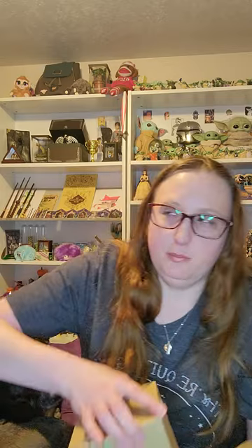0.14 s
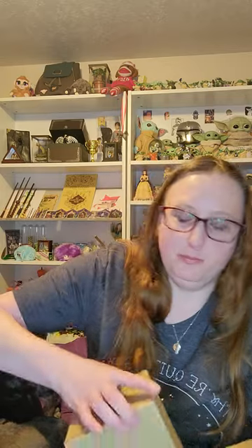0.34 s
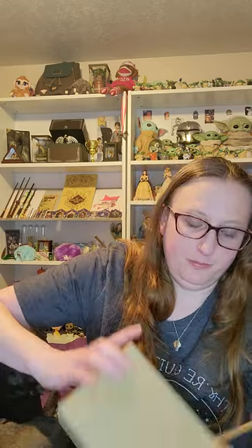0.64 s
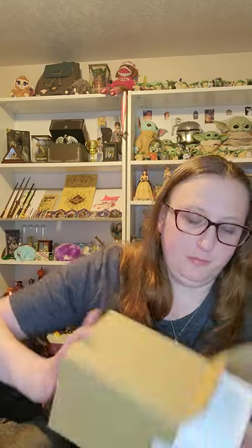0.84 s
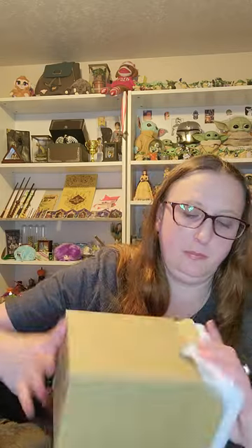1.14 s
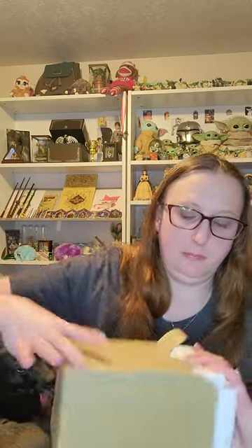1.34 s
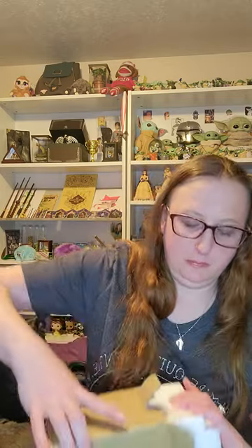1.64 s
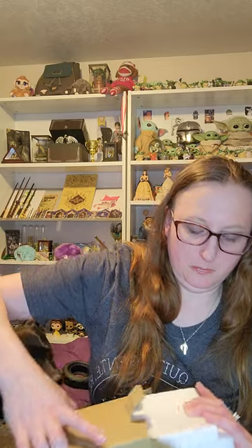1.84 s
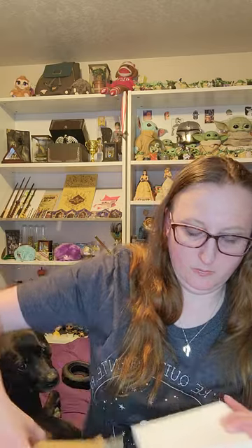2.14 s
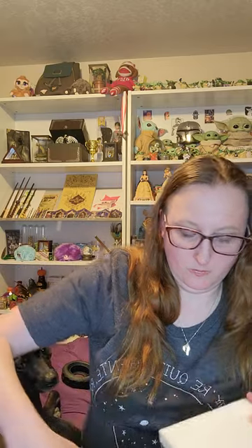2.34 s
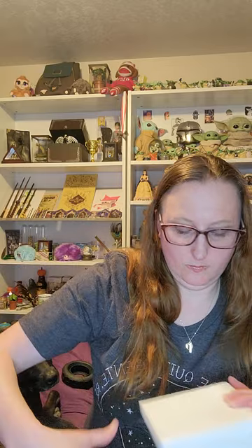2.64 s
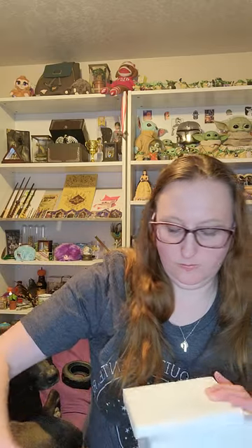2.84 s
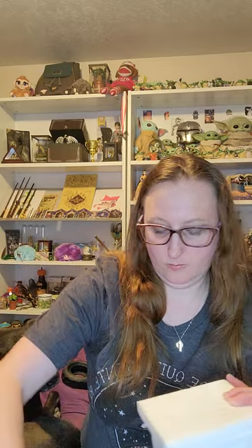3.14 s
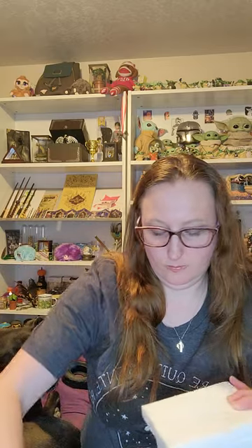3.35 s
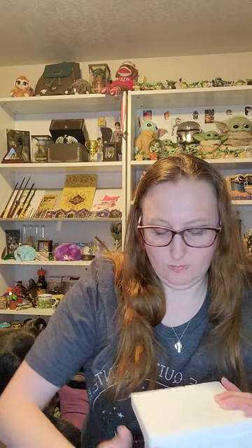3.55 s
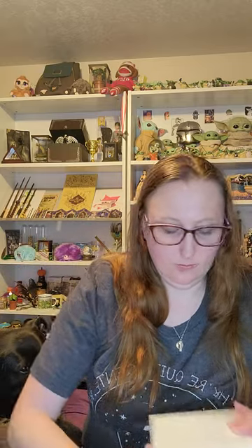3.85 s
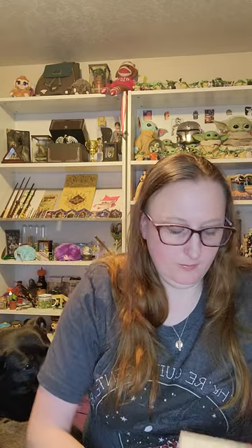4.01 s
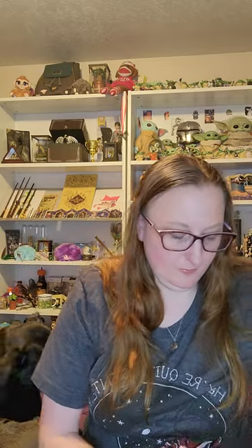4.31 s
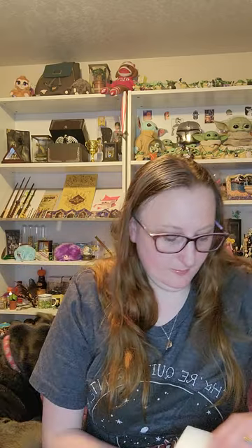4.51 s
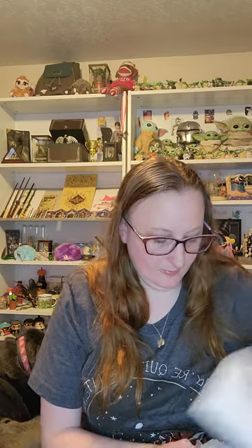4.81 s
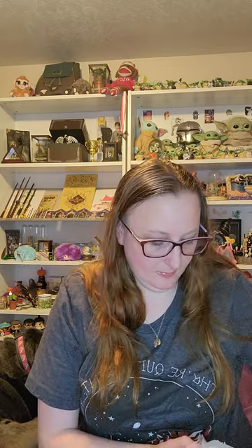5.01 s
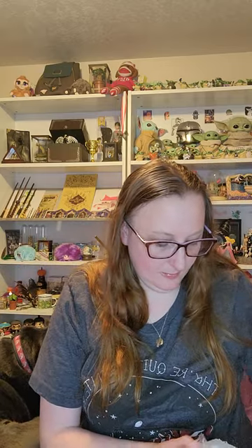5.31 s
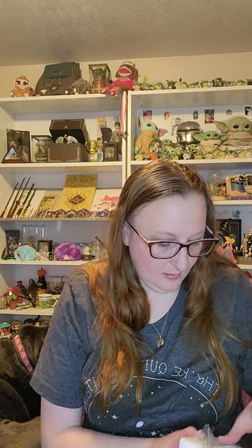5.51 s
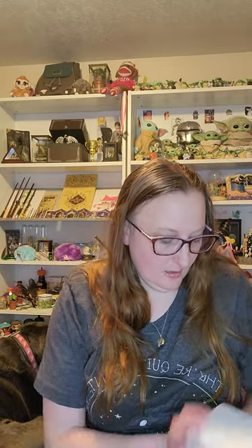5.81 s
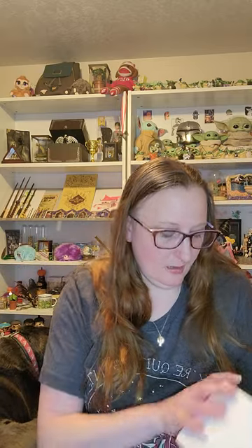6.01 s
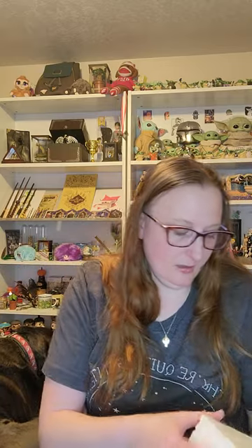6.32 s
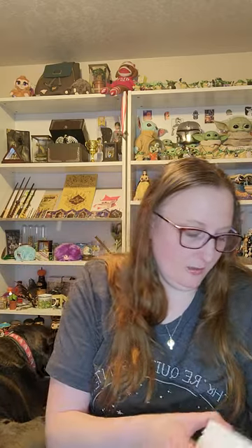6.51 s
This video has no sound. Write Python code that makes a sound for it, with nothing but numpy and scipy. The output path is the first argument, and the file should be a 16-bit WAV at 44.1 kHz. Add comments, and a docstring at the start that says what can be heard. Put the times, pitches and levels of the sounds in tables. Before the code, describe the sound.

In a small furnished room, close to the microphone, hands slide foam out of a cardboard box in uneven hissing strokes with hollow scuffs. The strongest rub ends near two seconds; the box is put aside with soft bumps and a loud double knock. Then foam is peeled with brighter hiss, small squeaks and dry snaps over a faint hush.

```python
"""First, hands slide a foam block out of a cardboard box: tiny slips ring the foam and drum the hollow box.
Around two to three seconds they set the box aside, and its walls and the air inside ring with knocks.
Then they peel the foam apart, with more hissing strokes, squeaks made of narrow noise, and dry snaps.
Soft low thumps come all along, in a small furnished room with a faint steady hush.
Two close microphone ports hear it slightly from the right."""
import sys
import numpy as np
from scipy import signal
from scipy.fft import rfft, irfft
from scipy.io import wavfile
from scipy.ndimage import map_coordinates

SR = 44100
rng = np.random.default_rng(int(sys.argv[2]) if len(sys.argv) > 2 else 0)


def waveform_to_disk(signal):
    """Save audio, clipped to [-1, 1], as 16-bit WAV at the path in sys.argv[1]."""
    frames = np.transpose(np.atleast_2d(signal))
    scaled = np.clip(frames, -1, 1) * 32767
    samples = np.round(scaled).astype(np.int16)
    wavfile.write(sys.argv[1], SR, samples)


N = 293919

# Where the hands are: (time [s], delay of left behind right [ms], left minus right [dB])
HAND_PLACES = [(0, 0.33, -.5), (.75, 0.2, -2), (1.25, 0.087, -1), (1.8, 0.178, 0), (2.3, 0.17, -1.5),
               (2.8, 0.39, -1.5), (3.2, 0.34, -3.5), (3.7, 0.2, -1), (4.5, 0.27, -2), (5.5, 0.24, -1.5),
               (6.66, 0.22, -1.5)]
# Color of the room hush: (frequency [Hz], relative level per Hz [dB])
HUSH_COLOR = [(18, -37), (30, 10.5), (161, -3.5), (303, 0.5), (554, 2.5), (1160, -4), (1430, -1),
              (2750, -8), (3490, -5), (7470, -14), (10800, -22), (14800, -15), (16000, -12)]
HUSH_DB = -74
# Strokes of the hands: (full grip reached [s], rise [s], hold [s], fall [s], foam hiss [dB],
# dull skin drag against hiss [dB], fine fizz against hiss [dB], box walls [dB], box cavity [dB])
HAND_STROKES = [ (0.079, 0.29, 0.037, 0.26, -44.5, -3, -6, -53, -57.5),
                (0.287, 0.066, 0.0091, 0.17, -52, -4.5, -4.5, -58, -61.5),
                (0.413, 0.16, .015, 0.13, -52.5, -2.5, -6, -58.5, -62.5),
                (0.472, 0.047, 0.041, .1, -59, 1, -6.5, -60, -67),
                (0.551, .02, 0.009, .03, -63, -2, -4, -65, -65.5),
                (0.631, 0.091, 0.1, 0.059, -40.5, -4, -4.5, -49, -60),
                (0.834, 0.051, 0.0167, 0.045, -56.5, 0.5, -3, -54, -63),
                (0.887, .08, 0.0083, 0.025, -49.5, 0, -5, -51.5, -61),
                (0.964, 0.063, 0.011, 0.034, -46, 0.5, -4.5, -45.5, -54.5),
                (1.034, .04, .01, 0.16, -58.5, -2, -6, -60.5, -60.5),
                (1.188, 0.19, 0.011, 0.21, -65, -2.5, -1.5, -65.5, -71.5),
                (1.238, 0.041, .07, .04, -68, 0.5, -7, -63.5, -72),
                (1.35, .02, .02, 0.074, -65.5, -1, -5, -61, -73),
                (1.423, 0.04, 0.023, .015, -71, -2, -3, -68, -82),
                (1.485, 0.009, 0.0038, 0.049, -61.5, 0.5, -23, -63, -85),
                (1.548, 0.023, 0.04, 0.091, -53.5, -1, -6, -58.5, -61.5),
                (1.711, 0.046, 0.081, .05, -42, -4.5, -5, -50.5, -62.5),
                (1.782, 0.11, 0.14, 0.17, -35.5, -9.5, -8, -51.5, -61),
                (1.974, .12, 0.056, 0.044, -36.5, -6.5, -3.5, -52.5, -60.5),
                (2.065, 0.014, 0.005, 0.058, -50, 0, 0.5, -59, -51.5),
                (2.213, 0.028, 0.064, 0.066, -49, -5.5, -7.5, -60.5, -56.5),
                (2.421, 0.14, 0.0096, .03, -62, 5.5, -16, -69, -67),
                (2.499, 0.049, .005, 0.044, -65, -0.5, -9, -74, -76),
                (2.636, 0.06, 0.025, 0.056, -62.5, 0.5, -5, -62, -64),
                (2.677, 0.016, 0.006, 0.069, -63, -14, -4, -64, -43),
                (2.923, 0.067, .006, 0.025, -59, -12, -3.5, -72, -62),
                (2.97, .02, .01, 0.053, -63.5, -2, -18, -74, -72),
                (3.005, 0.036, 0.011, 0.022, -52.5, -6, -7, -51, -41),
                (3.023, 0.0047, 0.012, 0.035, -44, 4, -13, -36, -36),
                (3.103, 0.14, 0.061, .045, -56, -13, -10.5, -62, -56.5),
                (3.238, 0.053, 0.013, 0.087, -60.5, -6.5, -9, -72, -54),
                (3.292, .04, 0.0069, 0.037, -70, -2, -5, -63, -61),
                (3.567, .008, 0.0033, 0.014, -44, -11.5, -1.5, -62.5, -63.5),
                (3.629, 0.032, 0.011, 0.069, -44.5, -3.5, -6.5, -59.5, -68),
                (3.699, 0.035, 0.12, .1, -43, -4.5, -9, -61.5, -60.5),
                (3.831, 0.1, 0.11, 0.11, -39, -7.5, -6, -59, -59),
                (3.973, 0.058, 0.019, 0.0485, -38.5, -2.5, -4, -55, -61.5),
                (4.058, 0.13, 0.0182, 0.42, -44.5, -3.5, -8, -63.5, -61.5),
                (4.198, 0.15, 0.019, .1, -46.5, -4.5, -13, -68, -65),
                (4.261, 0.18, 0.069, 0.47, -45, -4.5, -4.5, -66.5, -63),
                (4.435, .1, 0.0074, 0.14, -49, -15, 2, -81, -85),
                (4.57, 0.21, 0.021, 0.087, -40.5, -10.5, -5, -61, -60.5),
                (4.672, .15, 0.022, 0.091, -40, -4, -3, -55.5, -60),
                (4.735, 0.073, 0.022, 0.033, -43, -5.5, -4.5, -72, -63.5),
                (4.814, .04, 0.047, .04, -73, 6, -7, -75, -78),
                (4.88, 0.034, 0.043, 0.14, -48, -6, -4, -70, -79),
                (4.97, .08, 0.043, 0.1, -50.5, -11.5, -10, -74, -74),
                (5.098, .06, 0.022, 0.019, -50.5, -9.5, -1, -76, -90),
                (5.16, .015, 0.0098, .028, -61, 3, 3, -68, -66),
                (5.245, 0.1, .008, .02, -58.5, -12, -13, -92, -96),
                (5.308, .1, 0.13, 0.13, -54.5, -7, -11, -69.5, -75),
                (5.534, 0.12, 0.013, 0.085, -53.5, 0, -6, -67, -68),
                (5.628, 0.074, 0.019, 0.036, -42, -3.5, -2.5, -60, -61),
                (5.69, .03, .025, .02, -67, 0, -7, -77, -76.5),
                (5.73, .013, 0.033, .1, -44, -6.5, -4, -63, -58.5),
                (5.79, 0.077, 0.01, 0.057, -38.5, -6.5, -7, -56, -57.5),
                (5.843, .05, 0.037, 0.307, -47, -3.5, -9, -61, -60.5),
                (5.974, 0.081, .006, 0.088, -39.5, -4, -3.5, -57, -70),
                (6.017, .05, .04, 0.065, -54, 7.5, -5, -65, -66),
                (6.117, 0.22, 0.016, 0.076, -43, -2, -6.5, -56, -58.5),
                (6.195, .04, 0.074, 0.045, -50.5, -3, -4, -59, -66),
                (6.295, 0.025, 0.021, 0.16, -48.5, 3.5, -11, -59.5, -61.5),
                (6.357, 0.12, 0.0089, 0.17, -46, -8, -3, -72, -63),
                (6.452, 0.46, 0.044, .1, -48.5, -20, -20, -65, -69),
                (6.591, .18, 0.024, 0.12, -37, -3, -7.5, -53, -60.5),
                (6.643, .06, .008, .02, -35.5, -5, -10, -60, -66)]
EDGE_DB = 23.5  # gained over a stroke's rise and lost over its fall
SLIPS_PER_S = 9000
# Resonances of the rubbed foam, four groups: (frequency [Hz], width [Hz], relative level [dB])
LOWER_FOAM_RING = [(3273, 350, 3), (3720, 660, 2), (6990, 1100, 1.5), (7793, 610, -5)]
UPPER_FOAM_RING = [(4585, 430, 0.63), (4710, 118, 0), (5100, 480, 1.9), (5655, 700, 2.35)]
SKIN_DRAG = [(1284, 410, -4.5), (1772, 946, 0.5), (2090, 390, -0.25), (2644, 570, -7.5)]
FINE_FIZZ = [(8260, 880, -3), (10520, 2200, -2.74), (12700, 2560, -1.15), (15770, 900, -1.46)]
# How much of the hiss is the upper foam ring: (time [s], share [dB])
UPPER_RING_SHARE = [(0, -4), (.6, -5), (1.2, -4.5), (1.7, -3), (1.9, -2.5), (2.25, -2.5), (2.4, -7),
                    (2.7, -5.5), (3.1, -7), (3.6, -2.5), (4.4, -2.5), (5.2, -2), (5.8, -3), (6.1, -2.5),
                    (6.66, -5)]
# Ringing tones of the hollow box, before a hand damps them:
# (frequency [Hz], relative level [dB], time to die by 60 dB [s])
BOX_MODES = [(60.4, -12, 0.2), (190, -17, 0.094), (336, -10.5, 0.26), (400, 1, 0.1), (511, 10, 0.052),
             (574.6, 9, 0.043), (715, 11.5, 0.095), (781, 14.5, 0.077), (910, 6, 0.058), (1016, -11, 0.11),
             (1430, -1.5, 0.095), (1915, -2, 0.028), (3542, -9.5, 0.11), (5100, -8, 0.017),
             (7240, -27, .06)]
# Brief squeaks and hollow scuffs: (start [s], length [s], pitch [Hz], level [dB])
BRIEF_SQUEAKS = [(0.015, .14, 264, -57.5), (0.338, 0.27, 1098, -57.5), (0.62, 0.16, 792, -51.5),
                 (0.873, 0.033, 385, -55), (0.93, 0.043, 815, -52), (1.222, 0.18, 712, -59),
                 (1.191, 0.19, 1303, -62), (2.201, 0.069, 256, -49.5), (2.223, 0.1, 610, -56.5),
                 (2.204, 0.13, 366, -59), (2.326, .13, 322, -67.5), (2.377, 0.082, 1380, -64),
                 (2.378, 0.049, 2250, -59), (2.612, 0.056, 403, -50.5), (2.619, 0.045, 850, -66),
                 (2.69, 0.04, 436, -46), (2.693, 0.044, 840, -71), (2.882, 0.05, 365, -54),
                 (3.029, 0.062, 1072, -49), (3.033, 0.016, 7200, -53), (3.138, 0.083, 670, -58),
                 (3.277, 0.047, 693, -55.5), (3.328, 0.035, 687, -71.5), (3.7, 0.22, 1045, -59),
                 (3.75, .15, 7620, -42.5), (3.92, 0.076, 4340, -45), (4.151, 0.088, 3220, -44),
                 (4.62, 0.086, 3410, -48), (4.925, 0.09, 1476, -60), (5.272, 0.36, 1055, -67.5),
                 (5.604, 0.04, 2420, -45.5), (5.939, 0.038, 994, -48.5), (6.034, 0.056, 685, -56),
                 (6.537, 0.127, 732, -54)]
SQUEAK_WIDTH_HZ, SQUEAK_WIDTH_SHARE = 9.2, 0.021  # higher squeaks are broader
# Soft thumps through table and lap: (time [s], level [dB], pitch [Hz], swell [s])
SOFT_THUMPS = [(0.071, -58, 124, 0.005), (0.098, -47.5, 162, 0.0057), (0.884, -61, 99.6, 0.0042),
               (0.925, -50, 108, 0.0021), (0.944, -52, 99.6, 0.0042), (1.05, -60, 144, 0.0035),
               (1.094, -69, 178, 0.0046), (1.544, -56, 139, 0.0034), (2.07, -43, 228.5, 0.0024),
               (2.211, -49, 190, 0.0084), (2.242, -51.5, 183, 0.005), (2.62, -58, 183, 0.0043),
               (2.681, -43, 206, 0.0042), (3.01, -52, 216, 0.0034), (3.025, -47.5, 173, 0.0022),
               (3.051, -51, 200, 0.0049), (3.562, -51.5, 172, 0.0026), (4.527, -57, 112, 0.0042),
               (4.599, -44.5, 81.4, 0.0021), (5.155, -60, 62.5, 0.0017), (5.63, -65, 133, 0.0084),
               (5.732, -51, 200, 0.0014), (5.98, -54, 61.9, 0.0055), (6.019, -60, 51.1, 0.0052),
               (6.288, -43.5, 85, 0.0038)]
# Dry snaps of foam and tape: (time [s], level [dB])
DRY_SNAPS = [(0.337, -39), (1.0306, -47), (1.349, -52), (1.4172, -60), (1.4496, -55), (1.482, -45),
             (1.5403, -55), (2.8462, -54.5), (2.966, -47), (3.121, -48), (3.2316, -58), (3.435, -66),
             (3.475, -72), (3.564, -35), (3.616, -37), (4.8795, -52), (5.1521, -39.5), (5.7308, -33),
             (5.976, -29.5)]
# Knocks on the box: (time [s], level [dB], cavity tones against level [dB],
# hardness, as treble against level [dB])
BOX_KNOCKS = [(2.068, -41.5, -19, -12), (2.203, -47, -6, -13), (2.239, -38, -16.5, -9),
              (2.613, -47, -6, -5), (2.685, -30, 3, -15.5), (2.986, -42.5, 10, -3), (3.0255, -17, -5, -10),
              (3.03, -14.5, -2.5, -25), (3.142, -46, 14, -12.5), (3.253, -41, -15, -9)]
ROOM_T60_S = 0.15  # time for the echo to die by 60 dB
SCATTER_HZ, SCATTER_DB = 2430, 2  # treble that reaches each port from other faces
STRAIGHT_TOP_HZ = 5832  # the directly heard rubbing softens above this
CUTOFF_HZ = 15900


def amp(db):
    """Turns decibels into a gain."""
    return 10 ** (np.asarray(db) / 20)


def rms_one(x):
    """Scales a sound to an average strength (rms) of 1."""
    return x / np.sqrt(np.mean(x ** 2) + 1e-20)


def in_time(rows):
    """Draws table columns as curves, one value a sample."""
    s, *columns = np.transpose(rows)
    return [np.interp(np.arange(N) / SR, s, column) for column in columns]


def drift(rate):
    """Wanders by joining random points with straight lines, `rate` points a second."""
    knots = rng.standard_normal(500)
    return np.interp(np.arange(N) / SR * rate, np.arange(len(knots)), knots)


def clicks_at(times, gains):
    """Puts single-sample clicks at the given times [s]."""
    out = np.zeros(N)
    np.add.at(out, np.round(np.asarray(times) * SR).astype(int), gains)
    return out


def ring(clicks, hz, t60):
    """Lets each unit click start a dying sine that begins near height 1."""
    r = amp(-60 / (t60 * SR))
    w = 2 * np.pi * hz / SR
    return signal.lfilter([0, np.sin(w)], [1, -2 * r * np.cos(w), r * r], clicks + 1e-18)


def steep(x, hz, kind):
    """Cuts one side of the spectrum with a fourth-order filter."""
    return signal.sosfilt(signal.butter(4, hz, kind, fs=SR, output="sos"), x)


def resonate(x, peaks, patchy_db):
    """Rings side-by-side resonances whose strengths wander as the grip changes; rms 1."""
    out = 0
    for k, (hz, width, level_db) in enumerate(peaks):
        r = np.exp(-np.pi * width / SR)
        tone = signal.lfilter([1, 0, -1], [1, -2 * r * np.cos(2 * np.pi * hz / SR), r * r], x)
        gain = amp(level_db + patchy_db * drift(9.0))
        out = out + (-1) ** k * gain * rms_one(tone)
    return rms_one(out)


def hush():
    """Colors steady noise for room and microphone; both ports share part of it."""
    hz = np.maximum(np.fft.rfftfreq(N, 1 / SR), 1)
    color_hz, color_db = np.transpose(HUSH_COLOR)
    color = amp(np.interp(np.log(hz), np.log(color_hz), color_db))
    white = rng.standard_normal((3, N))
    ports = white[:2] + 0.67 * white[2]
    return amp(HUSH_DB) * rms_one(irfft(rfft(ports) * color, N))


def stroke_levels():
    """Lets strokes rise, hold and fall, adding in power; gains of hiss, drag, fizz, walls, cavity."""
    t, power = np.arange(0, N / SR + .002, .001), 1e-20
    for s, rise, hold, fall, hiss_db, drag_db, fizz_db, wall_db, cavity_db in HAND_STROKES:
        # 0 during the hold, 1 at the end of the rise or fall time
        away = np.maximum(0, np.maximum((s - t) / rise, (t - s - hold) / fall))
        layers_db = np.array([hiss_db, hiss_db + drag_db, hiss_db + fizz_db, wall_db, cavity_db])
        power = power + amp(layers_db[:, None] - EDGE_DB * away) ** 2
    return in_time(np.column_stack([t, *np.sqrt(power)]))


def slips(spread_db):
    """Scatters stick-slip clicks, a few much larger: one hail heard straight, two from side faces."""
    strength = np.minimum(rng.exponential(1, (3, N)), 5)
    sizes = amp(spread_db * strength) * rng.choice([-1, 1], (3, N))
    happens = rng.random((3, N)) < SLIPS_PER_S / SR
    return rms_one(sizes * happens)


def chirps(hail):
    """Lets 40 small-cell pitches in the foam hiss sing at random moments."""
    pitches = np.geomspace(1500, 7000, 40) * rng.uniform(.98, 1.02, 40)
    out = 0
    for hz in pitches:
        gate = np.clip(drift(18.0) - .9, 0, .7)
        middle_weight = np.exp(-np.log(hz / 4600) ** 2 / 2.3)
        out = out + gate * rms_one(ring(hail, hz, 390.0 / hz)) * middle_weight
    return rms_one(out)


def rubbing():
    """Drives the foam, the box walls and the box cavity with the same hail of slips."""
    hiss, drag, fizz, wall, hollow = stroke_levels()
    hail = slips(spread_db=3.0) * amp(1.78 * drift(70.0))

    # the two foam rings share the power of the hiss
    upper = np.clip(amp(in_time(UPPER_RING_SHARE)[0]), 0, .95)
    lower = np.sqrt(1 - upper ** 2)
    foam = lower * resonate(hail, LOWER_FOAM_RING, 1.32) + upper * resonate(hail, UPPER_FOAM_RING, 1.5)
    foam += amp(-11) * chirps(hail)
    dull = resonate(hail, SKIN_DRAG, 2.42)
    fine = rms_one(steep(resonate(hail, FINE_FIZZ, 0.71), 8400, "high"))
    foam = hiss * foam + drag * dull + fizz * fine

    drum = []
    for hz, level_db, t60 in BOX_MODES[2:10]:
        gain = amp(level_db + 2 * drift(7.6))
        drum.append(gain * ring(hail, hz, 0.39 * t60))
    cavity = rms_one(steep(sum(drum[:3]), 212, "high"))  # three lowest of these tones
    walls = rms_one(steep(sum(drum[3:]), 643, "high"))
    return steep(foam, 1120, "high") + wall * walls + hollow * cavity


def squeaks():
    """Sends friction noise through one narrow resonance, swelling and fading."""
    out, friction = np.zeros(N), rng.standard_normal(N)
    for s, length, hz, level_db in BRIEF_SQUEAKS:
        width = SQUEAK_WIDTH_HZ + SQUEAK_WIDTH_SHARE * hz
        t60 = np.log(1000) / (np.pi * width)  # a narrow resonance rings longer
        at, size = round(s * SR), round(length * SR)
        tone = ring(np.gradient(friction[at:at + size]), hz, t60)
        out[at:at + size] += amp(level_db) * rms_one(tone) * signal.windows.tukey(size, .7)
    return out


def thumps():
    """Makes each soft push a low swing that swells in a few ms and dies."""
    out, t = np.zeros(N), np.arange(SR // 5) / SR
    for s, level_db, hz, swell in SOFT_THUMPS:
        envelope = (t / swell) * np.exp(1 - t / swell)  # reaches 1 at the swell time
        swing = amp(level_db) * np.sin(2 * np.pi * hz * t) * envelope
        at = round(s * SR)
        out[at:at + len(t)] += swing[:N - at]
    return out


def snaps():
    """Makes each snap a burst of bright crackle a few ms long."""
    s, level_db = np.transpose(DRY_SNAPS)
    fade = np.exp(-1 / (0.0015 * SR))  # 1.5 ms decay
    shape = signal.lfilter([1], [1, -fade], clicks_at(s, amp(level_db)) + 1e-18)
    crackle = resonate(rng.standard_normal(N), LOWER_FOAM_RING + UPPER_FOAM_RING + FINE_FIZZ, 0.41)
    return shape * crackle


def knocks():
    """Strikes all box tones at each knock; harder contact brings out the high ones."""
    s, level_db, cavity_db, hard_db = np.transpose(BOX_KNOCKS)
    out = np.zeros(N)
    chance_db = rng.normal(0, 2, (len(s), len(BOX_MODES)))
    for k, (hz, mode_db, t60) in enumerate(BOX_MODES):
        if hz < 530:
            reach_db = cavity_db + 1.5
        elif hz > 1200:
            reach_db = hard_db + 19.5
        else:
            reach_db = 0
        hits = clicks_at(s, amp(level_db + mode_db - 24.0 + chance_db[:, k] + reach_db))
        # the cavity swings against the walls; the holding hand shortens both
        out += np.sign(530 - hz) * ring(hits, hz, 0.56 * t60)
    return out


def room(x):
    """Echoes off shelves and walls as dying noise, different in each port, thinner in the bass."""
    t = np.arange(SR // 2) / SR
    tail = rng.standard_normal((2, len(t))) * amp(-60 * t / ROOM_T60_S) * (t > .002)
    tail = signal.sosfilt(signal.butter(1, 900, "high", fs=SR, output="sos"), tail)
    tail /= np.sqrt(np.sum(tail ** 2, axis=1, keepdims=True))
    return signal.fftconvolve(x[None], tail, axes=1)[:, :N]


def scene():
    """Places the sources at the hands, heard later on the left, then adds echo, thumps and hush."""
    lag_ms, pan_db = in_time(HAND_PLACES)
    straight, *faces = rubbing()
    blows = knocks() + snaps() + squeaks()
    hands = signal.lfilter(*signal.butter(1, STRAIGHT_TOP_HZ, fs=SR), straight) + blows
    late = map_coordinates(hands, [np.arange(N) - lag_ms * SR / 1000], order=3)
    # treble reaches each port from its own faces
    scattered = amp(SCATTER_DB) * signal.lfilter(*signal.butter(1, SCATTER_HZ, "high", fs=SR), faces)
    near = (np.array([late, hands]) + scattered) * amp([pan_db / 2, -pan_db / 2])
    echo = amp(-1.0) * room(blows) + amp(-4) * room(straight)
    low = thumps() * amp([[-2.5], [1.5]])  # left, right
    return amp(-2.04) * near + echo + low + hush()


def record(dry):
    """Rolls off the deepest bass and cuts the top sharply."""
    dry = signal.sosfilt(signal.butter(2, 45, "high", fs=SR, output="sos"), dry)
    return signal.sosfilt(signal.cheby2(14, 70, CUTOFF_HZ + 400, fs=SR, output="sos"), dry)


dry = scene()
out = record(dry)
waveform_to_disk(out)
```